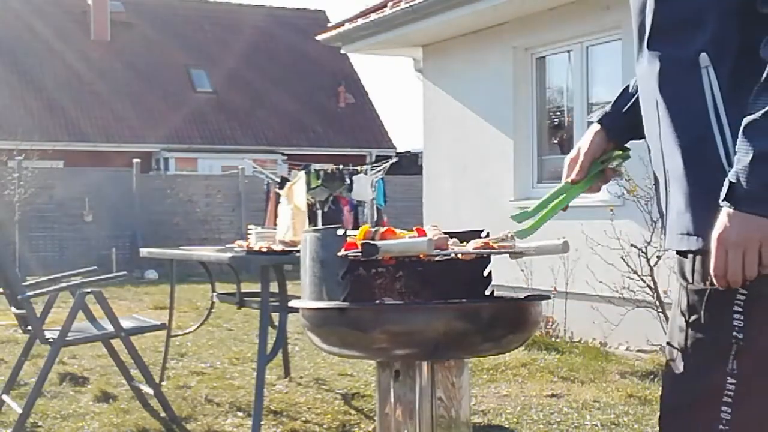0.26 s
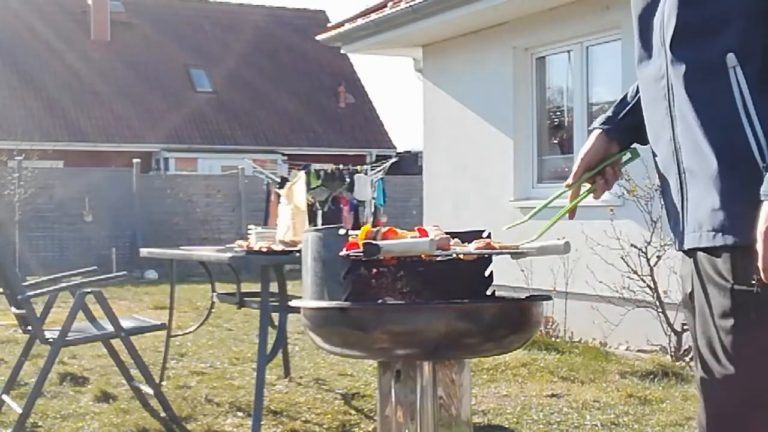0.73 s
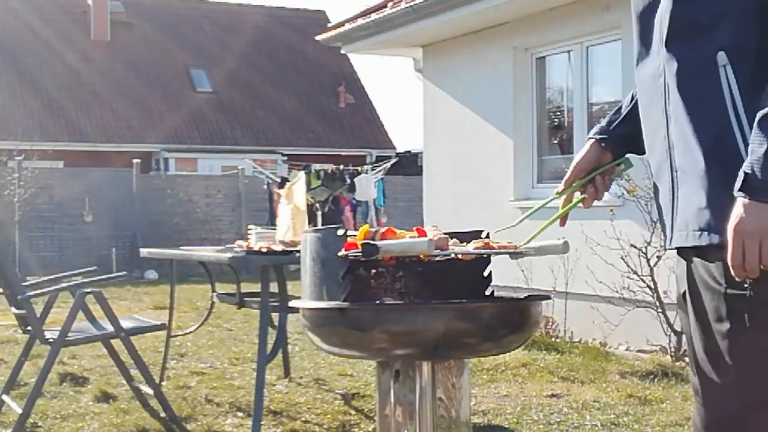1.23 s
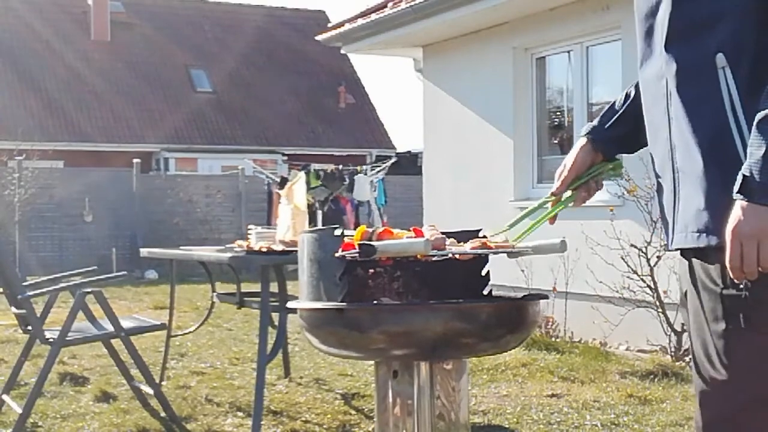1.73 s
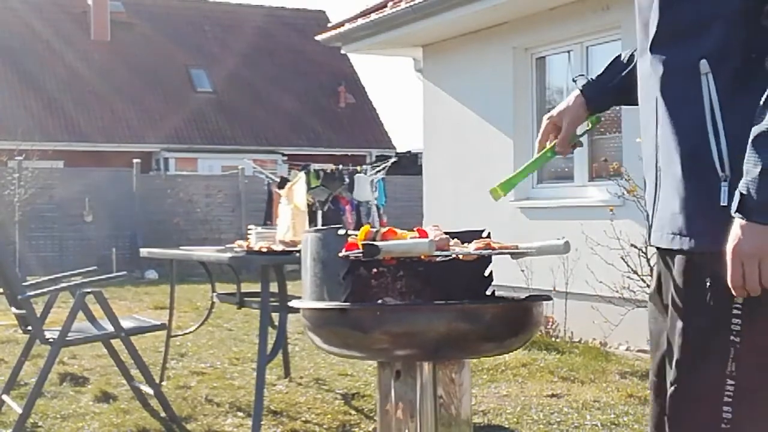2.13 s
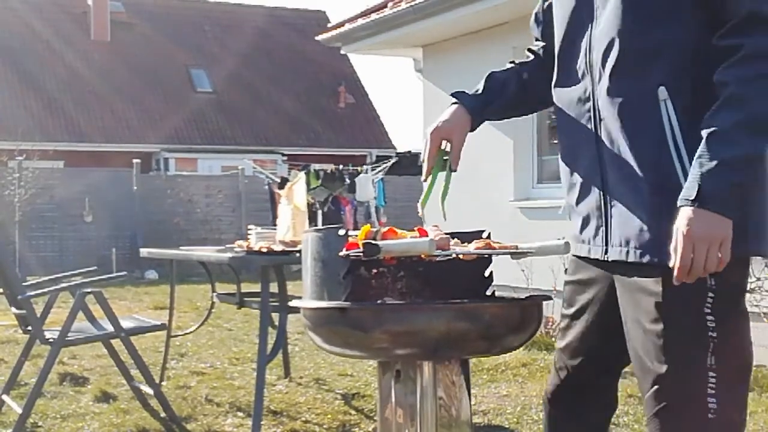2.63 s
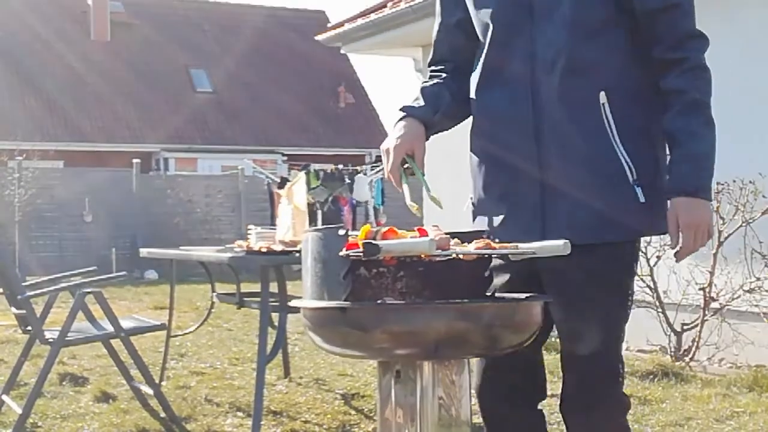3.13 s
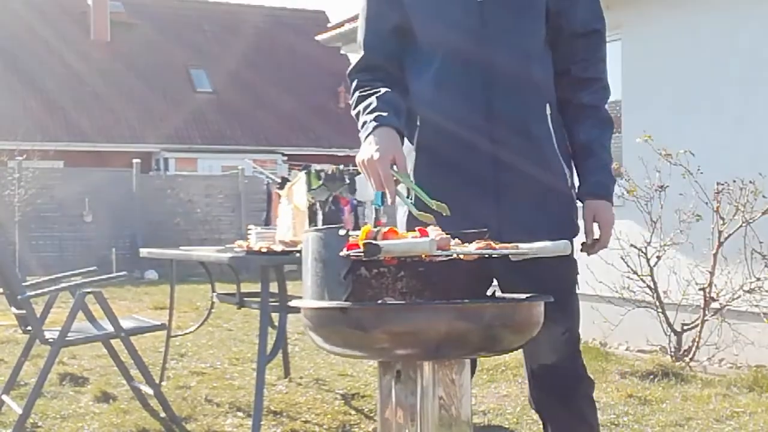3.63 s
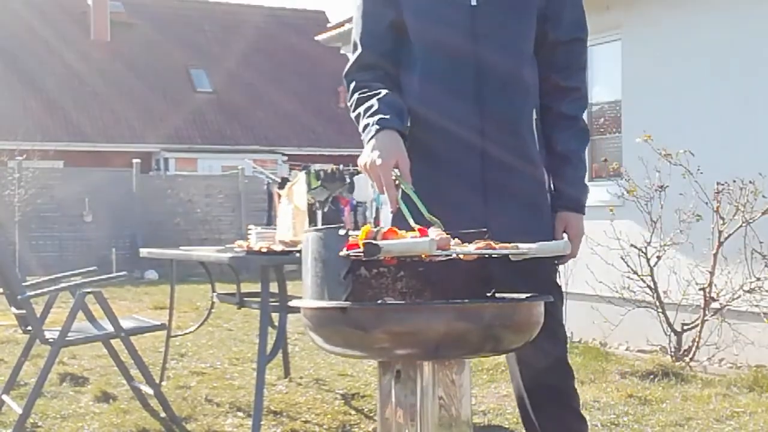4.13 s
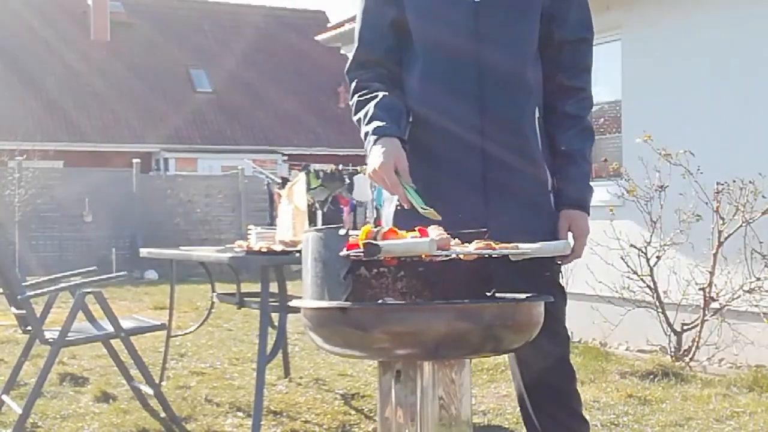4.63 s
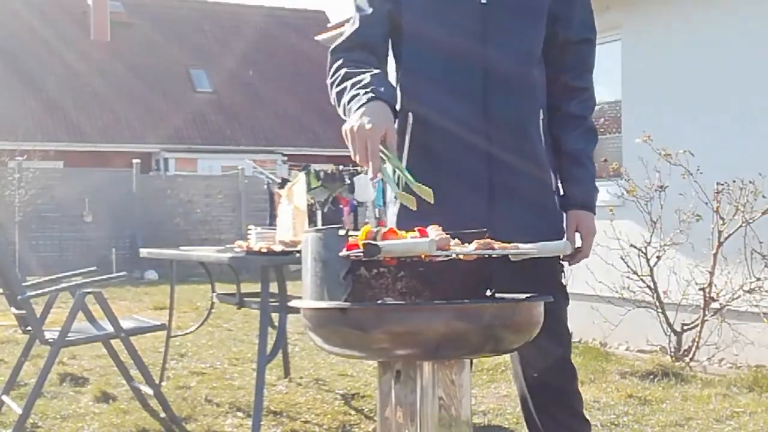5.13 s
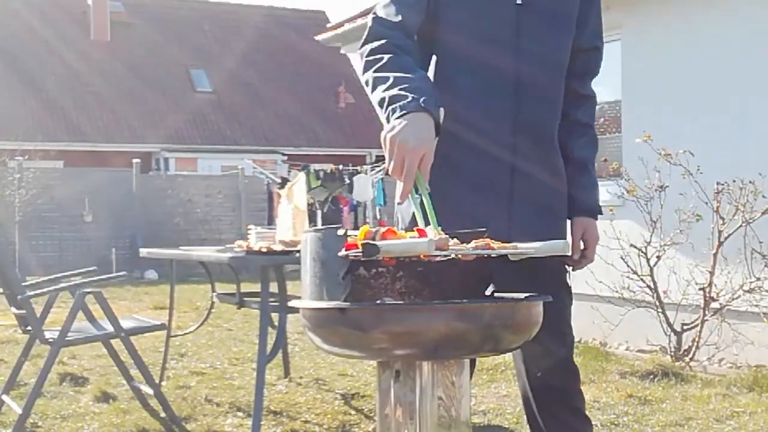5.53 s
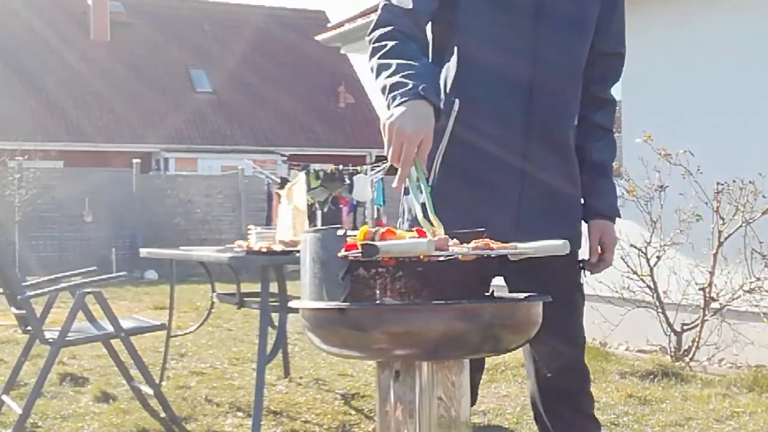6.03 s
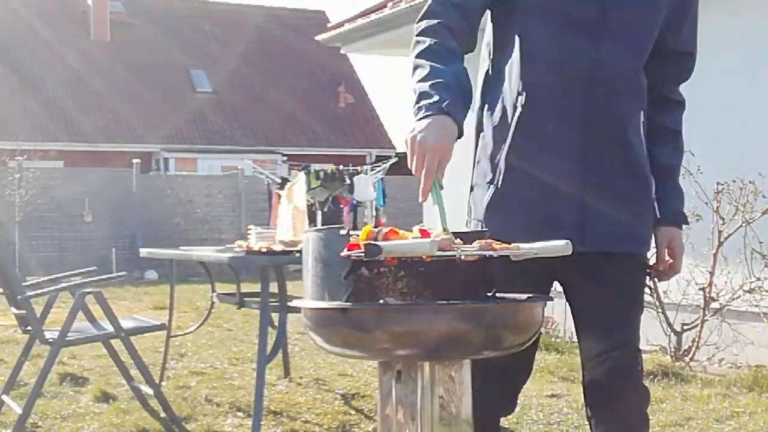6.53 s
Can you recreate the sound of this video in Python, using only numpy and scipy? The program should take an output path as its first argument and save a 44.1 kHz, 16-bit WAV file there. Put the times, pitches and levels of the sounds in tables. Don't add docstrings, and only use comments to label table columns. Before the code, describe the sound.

Outdoors, a hollow tray judders and lands, then steel tongs click and drag along grill bars over faint sizzle, car rumble, birdsong and late gusts.

```python
import sys
import numpy as np
from scipy import signal
from scipy.fft import rfft, irfft, next_fast_len
from scipy.io import wavfile
from scipy.ndimage import uniform_filter1d, map_coordinates

SR = 44100
rng = np.random.default_rng(int(sys.argv[2]) if len(sys.argv) > 2 else 0)


def transcribe(signal):
    frames = np.atleast_2d(signal).T
    limited = np.clip(frames, -1, 1)
    pcm = np.round(limited * 32767).astype(np.int16)
    wavfile.write(sys.argv[1], SR, pcm)


def gain_from_db(level_db):
    decades = np.asarray(level_db, float) / 20
    return 10 ** decades


N = 298943

# (time [s], level [dB])
CAR = [(0, -54), (.5, -52.5), (1.2, -48), (1.85, -44), (2.35, -42), (2.65, -48), (3.2, -50.5), (3.6, -53.5),
       (4.2, -52.5), (4.6, -64), (5, -60), (6.78, -60)]
# (frequency [Hz], width [Hz], level [dB])
RATTLE = [(2600, 530, 7), (3130, 630, 6), (3791.9, 250, 6), (4180, 120, 9), (4869, 390, 5)]


def unit(x):
    return x / np.sqrt(np.mean(x ** 2) + 1e-20)


def along(points, hz):
    f, v = np.transpose(points)
    return np.interp(np.log(hz + 1), np.log(f + 1), v)


def curves(rows):
    s, *cols = np.transpose(rows)
    return [np.interp(np.arange(N) / SR, s, c) for c in cols]


def wobble(rate):
    knots = rng.standard_normal(int(N * rate / SR) + 4)
    return map_coordinates(knots, [np.arange(N) * rate / SR])


def grit(rate, depth_db):
    return unit(gain_from_db(depth_db * wobble(rate) + 0.49 * depth_db * wobble(rate / 5)))


def swell(rows, landing_db=60, curl=1):
    now = np.arange(N) / SR
    t = np.arange(0, N, 22)[:, None] / SR
    s, rise, hold, db, fall = np.abs(np.transpose(rows))
    early_db = 60 * np.maximum(s - t, 0) / rise
    late_db = 60 * (np.maximum(t - s - hold, 0) / fall) ** curl
    level_db = -db - early_db - 10 * np.maximum(early_db - landing_db, 0) - late_db
    return np.interp(now, t[:, 0], np.linalg.norm(gain_from_db(level_db), axis=1))


def filtered(x, response):
    m = next_fast_len(N + 8192, True) // 2 * 2
    h = response(np.fft.rfftfreq(m, 1 / SR))
    h = h / np.sqrt(np.mean(np.abs(h) ** 2))
    return irfft(rfft(x, m) * h, m)[..., :N]


def colour(points):
    def response(hz):
        cepstrum = irfft(np.log(gain_from_db(along(points, hz)) + 1e-6))
        half = len(cepstrum) // 2
        cepstrum[1:half] *= 2
        cepstrum[half + 1:] = 0
        return np.exp(rfft(cepstrum))
    return response


def modes(table):
    def response(f):
        total = 0
        for k, (centre, width, db) in enumerate(table):
            band = 1j * f * width
            total = total + (-1) ** k * gain_from_db(db) * band / (centre * centre - f * f + band)
        return total
    return response


def pair(alike, lag, patchy_db=None):
    a, b = rng.standard_normal((2, N))
    alike = np.clip(alike, 0, 1)
    late = a[np.clip(np.arange(N) - np.round(lag).astype(int), 0, N - 1)]
    both = np.array([alike * late + np.sqrt(1 - alike ** 2) * b, a])
    if patchy_db is None:
        return both
    z = signal.stft(both, nperseg=512)[2]
    field = uniform_filter1d(rng.standard_normal(z.shape[1:]), size=2, axis=0)
    field = uniform_filter1d(field, size=5, axis=1)
    return unit(signal.istft(z * gain_from_db(patchy_db * unit(field)), nperseg=512)[1][:, :N])


def sides(pan_db):
    g = gain_from_db(np.array([pan_db / 2, -pan_db / 2]))
    return g / np.sqrt(np.mean(g ** 2, axis=0))


def add(out, s, burst):
    i = round(s * SR)
    out[..., i:i + burst.shape[-1]] += burst[..., :N - i]


def town_rumble():
    # (frequency [Hz], level [dB])
    rumble_spectrum = [(12, -41), (20, -17), (37, -2), (96, -2), (129, -4.5), (248, -7.5), (400, -22),
                       (520, -42.5), (880, -120)]
    lag_s = 0.14
    rumble_db, = curves([(s + lag_s, -53.5 + 0.71 * (db + 48.5)) for s, db in CAR])
    return gain_from_db(rumble_db + 3 + 1.5 * wobble(6)) * filtered(pair(.99, lag=0), colour(rumble_spectrum))


def passing_car():
    # (time [s], lag of left [samples], share common to both ports [0-1], ground comb [Hz],
    # bounce share [0-1])
    bearing = [(0, -27, 0.03, 1020, 0.13), (1, -22, 0.32, 1090, 0.28), (2.1, -23, 0.76, 1100, 0.65),
               (2.9, -15.5, 0.55, 980, 0.3514), (3.4, -14.5, 0.6, 1130, 0.3636),
               (3.8, -4.5, 0.25, 1136, 0.54), (4.3, -6, 0.55, 1260, 0.6194), (4.7, 7.5, 0, 1150, 0.097),
               (6.8, -9, 0.34, 990, 0.34)]
    # (time [s], frequency [Hz], level [dB])
    engine = [(0, 52.1, -55), (.6, 52.3, -47), (1.2, 52.4, -43.5), (1.7, 52.1, -47), (2.1, 51.4, -49.5),
              (2.4, 49.6, -61.5)]
    # (frequency [Hz], level [dB])
    tyres = [(120, -19), (200, -20), (250, -0.5), (310, -14.5), (480, -0.5), (610, -7), (900, -2),
             (1200, -2), (1600, -0.5), (2100, -12.5), (3000, -15), (4800, -21.5), (6000, -25.5),
             (8000, -38), (13000, -120)]
    car_db, = curves(CAR)
    lag, alike, ground_hz, share = curves(bearing)
    roar = filtered(pair(alike, lag), colour(tyres))
    dull = signal.sosfiltfilt(signal.butter(3, 2600, fs=SR, output="sos"), roar)
    bounce = np.zeros((2, N))
    for k in (1, 2, 3):
        delay = (k * SR / ground_hz).astype(int)
        bounce += share ** k * dull[:, np.clip(np.arange(N) - delay, 0, N)]
    evened = (roar + bounce) / (.93 * np.sqrt(1 + share ** 2 + share ** 4 + share ** 6))
    tyre_roar = gain_from_db(car_db + 3 + 1.1 * wobble(7)) * evened
    hum_hz, hum_db = curves(engine + [(engine[-1][0] + .3, engine[-1][1], -90)])
    hum = gain_from_db(hum_db - 2.0 + 1.5 * wobble(4.98)) * np.sin(2 * np.pi * np.cumsum(hum_hz) / SR)
    return tyre_roar + hum


def wind():
    # (frequency [Hz], level [dB])
    buffet = [(12, -17), (20, -6.5), (59, -1), (140, -13.5), (180, -38), (310, -120)]
    # (frequency [Hz], level [dB])
    flutter = [(71, -18.5), (120, -2.5), (257, -18.5), (458, -44), (553, -73), (600, -40.5), (780, -89),
               (1320, -120)]
    # (time at full force [s], hold [s], level [dB])
    gusts = [(4.899, 0, -39.5), (4.973, 0, -40.5), (5.131, 0.05756, -42.5), (5.268, 0.023, -35.5),
             (5.371, 0.15, -36.5), (5.62, 0.0096, -39.5), (5.682, 0.034, -33), (5.862, 0.00548, -32),
             (5.952, 0.017, -32), (6.041, 0.089, -33.5), (6.155, 0.171, -29), (6.381, 0.0031, -28.5),
             (6.431, 0.097, -30), (6.585, 0, -36), (6.624, 0.018, -29.5), (6.737, 0, -29.5)]
    # (time [s], peak level [dB], length [s])
    puffs = [
        (2.437, -20.5, 0.01004),
        (5.869, -30.5, 0.0057),
        (6.367, -34, 0.0069),
        (6.624, -24, 0.0088),
    ]
    rise_s, fall_s = 0.30284, 0.13
    breeze_start_s, breeze_db, breeze_db_per_s = 4.7, -52.5, 8
    since = np.arange(N) / SR - breeze_start_s
    breeze = gain_from_db(breeze_db + breeze_db_per_s * since + 92 * np.minimum(since, 0))
    gusting = swell([(s, rise_s, hold, db, fall_s) for s, hold, db in gusts])
    buffet_db = 20 * np.log10(np.hypot(breeze, gusting))
    flutter_db = -10.0 + 0.88 * (buffet_db + 35.0)
    lumps = unit(gain_from_db(2.25 * wobble(30)))
    out = gain_from_db(buffet_db) * lumps * filtered(pair(0.89, lag=0), colour(buffet))
    out += gain_from_db(buffet_db + flutter_db) * lumps ** 1.3 * filtered(pair(.72, lag=0), colour(flutter))
    for s, db, length in puffs:
        u = np.linspace(0, 3, int(3 * length * SR))
        add(out, s, gain_from_db(db - 3.0) * np.sin(np.pi * u) * np.exp(-1.2 * u))
    return out


def sparrows():
    # (time [s], frequency [Hz], level [dB])
    chirps = [
        [(.362, 3400, -58), (.378, 4600, -51), (.402, 4750, -52), (.408, 4200, -50), (.418, 3900, -54)],
        [(.462, 3200, -60), (.477, 3900, -55), (.49, 3400, -56)],
        [(1.366, 4400, -42), (1.4, 2900, -44)],
        [(1.968, 4550, -54), (1.99, 4750, -46), (2.025, 4600, -52)],
        [(4.867, 4150, -53), (4.877, 4750, -49), (4.884, 5000, -56), (4.894, 3400, -53)],
        [(4.913, 2700, -53), (4.922, 2900, -46), (4.926, 3100, -55)],
        [(4.894, 4250, -46), (4.907, 4800, -47), (4.916, 5100, -56), (4.926, 4300, -47), (4.933, 3200, -53),
         (4.945, 2700, -54), (4.962, 3400, -50), (4.972, 3250, -57)],
        [(5.864, 4100, -47), (5.882, 4800, -41), (5.89, 5100, -52), (5.898, 4000, -43)],
        [(5.899, 4350, -44), (5.915, 4950, -48), (5.927, 4300, -45), (5.933, 3050, -47)],
        [(5.935, 3300, -50), (5.947, 3400, -43), (5.955, 3700, -46), (5.962, 4750, -45), (5.967, 4100, -47)],
        [(5.965, 3300, -41), (5.985, 3800, -42), (5.992, 4600, -51), (5.997, 3400, -42), (6.004, 2950, -43),
         (6.012, 3200, -45), (6.023, 2950, -47)],
    ]
    # (time [s], frequency [Hz], level [dB])
    peeps = [
        (3.99, 2420, -53),
        (4.152, 3602, -54.5),
        (5.38, 2370, -59),
        (5.608, 2320, -60),
        (6.235, 2562, -54),
    ]
    # (delay [s], level [dB])
    echoes = [(.009, -13), (.017, -14), (.031, -15)]
    peep_s, peep_sag, edge_s, flutter_db = .033, .95, .003, 2.5
    out, warble, flutter = np.zeros(N), wobble(260), wobble(300)
    far_notes = [[(s, hz, db - 3), (s + peep_s, peep_sag * hz, db - 3)] for s, hz, db in peeps]
    for note in chirps + far_notes:
        s, hz, db = np.transpose(note)
        t = np.arange(s[0], s[-1], 1 / SR)
        first = round(s[0] * SR)
        now = slice(first, first + len(t))
        glide = uniform_filter1d(np.interp(t, s, hz), size=90) * (1 + .01 * warble[now])
        soft_ends = np.minimum(np.minimum(t - s[0], s[-1] - t) / edge_s, 1)
        size = gain_from_db(np.interp(t, s, db) + flutter_db * flutter[now]) * soft_ends
        add(out, s[0], size * np.sin(2 * np.pi * np.cumsum(glide) / SR))
    scattered = sum(gain_from_db(db) * np.roll(out, round(s * SR)) for s, db in echoes)
    out = gain_from_db(-1) * (out + scattered)
    return np.array([out, np.roll(out, 22)])


def footsteps():
    # (time [s], frequency [Hz], peak level [dB], length [s])
    footfalls = [
        (2.68, 99.8, -48, 0.1839),
        (2.96, 95.74, -41, 0.16565),
        (4.12, 111, -49, .14),
    ]
    out = np.zeros((2, N))
    for s, hz, db, length in footfalls:
        t = np.arange(int(length * SR)) / SR
        add(out, s, gain_from_db(db) * np.sin(np.pi * t / length) * np.sin(2 * np.pi * hz * t))
    return out


def sizzle():
    # (time [s], level [dB])
    frying = [(0, -55), (.8, -54), (1.1, -60), (1.3, -48.5), (1.6, -48.5), (1.85, -55.5), (2.2, -45.5),
              (2.9, -54.5), (3.3, -47), (3.9, -55), (4.3, -58), (4.65, -59), (5, -56), (5.25, -60.5),
              (5.45, -51.5), (6.1, -55), (6.78, -52.5)]
    # (frequency [Hz], level [dB])
    fizz_spectrum = [(1180, -60), (2000, -33), (2300, -10.5), (4130, -8.5), (4630, -10.5), (6470, -9.5),
                     (8660, 2.5), (9800, -4.5), (15500, -37.5), (16100, -24), (16500, -61)]
    fizz_db, = curves(frying)
    spits = gain_from_db(1.1 * wobble(3.2)) * grit(300, depth_db=0.5)
    fizz = filtered(spits * pair(0.15, lag=19, patchy_db=3.0), colour(fizz_spectrum))
    return gain_from_db(fizz_db + 0.5) * sides(-3.0)[:, None] * fizz


def pop():
    # (time [s], peak level [dB], start frequency [Hz], end frequency [Hz], t60 [s])
    bursts = [
        (2.536, -10.5, 3578, 1480, 0.027),
        (2.538, -12.5, 1215, 870, 0.015),
    ]
    out, t = np.zeros((2, N)), np.arange(SR // 10) / SR
    for s, db, start_hz, end_hz, t60 in bursts:
        hz = end_hz + (start_hz - end_hz) * np.exp(-t / 0.00085)
        decay = gain_from_db(db - 60 * t / t60) * np.minimum(t / 0.0011, 1)
        tone = decay * np.sin(2 * np.pi * np.cumsum(hz) / SR)
        add(out, s, sides(-13)[:, None] * [np.roll(tone, 19), tone])
    return out


def brushes():
    # (time [s], peak level [dB], t60 [s], left over right [dB])
    touches = [(2.13, -39, 0.085, -1), (2.235, -39, 0.72, -5.5), (2.348, -23, .04, -10),
               (2.44, -28.5, 0.24, -10), (2.534, -25.5, 0.046, -11), (3.689, -39.5, 0.45, -7.5),
               (3.81, -47, 0.14, 3.5), (5.765, -41.5, 0.16, -1), (5.83, -59.5, 0.03, 1)]
    out, t = np.zeros((2, N)), np.arange(SR // 6) / SR
    for s, db, t60, pan_db in touches:
        add(out, s, gain_from_db(db - 60 * t / t60) * np.minimum(t / 0.0013, 1) * sides(pan_db)[:, None])
    return filtered(out * pair(0.63, lag=12.2, patchy_db=4.0), modes(RATTLE))


def tray():
    # (time at full force [s], rise per 60 dB [s], hold [s], level [dB], fall per 60 dB [s])
    shoves = [(1.249, 0.1, .01, -47, 1.3), (1.271, 0.12, .008, -43.5, -0.03),
              (1.3, 0.03, 0.033, -46.5, -0.1), (1.351, 0.11, .045, -42, -0.03),
              (1.425, 0.25, .015, -44, 0.3), (1.465, -0.44, .004, -43, 0.0043),
              (1.507, 0.27, 0.019, -40.5, 0.45), (1.658, 0.7, .01, -51, .5)]
    # (time [s], peak level [dB], rattle re
    # peak [dB], contact [s])
    knocks = [
        (1.6146, -21, -7, 0.00094),
        (1.6211, -26, -8, 0.00057),
        (1.6237, -26.5, -11, .0004),
        (1.6435, -35, -14, 0.00068),
        (1.664, -36, -20, 0.0021),
        (2.536, -34.5, -20, .0007),
    ]
    # (frequency [Hz], width [Hz], level [dB])
    body_modes = [(191.54, 31, 0), (332, 34, 2.5), (710, 87, 2), (1461.9, 490, -8), (2103.8, 310, -8.5)]
    # (time [s], peak level [dB], frequency [Hz])
    jingles = [(1.243, -38.5, 4800), (1.268, -33, 4240), (1.269, -35.5, 4800), (1.323, -35, 4900),
               (1.348, -29, 4240), (1.355, -32, 1510), (1.375, -37, 5000), (1.39, -37, 2000),
               (1.41, -38, 2060), (1.5, -40, 2700), (1.52, -37, 2550), (1.555, -39, 4180),
               (1.467, -36, 3950), (1.511, -34, 4800), (1.628, -31, 4226), (1.624, -28, 2470),
               (1.621, -31, 2040)]
    # (time [s], frequency [Hz], level [dB])
    judder = [(1.25, 449.8, -63), (1.34, 525.5, -44), (1.4, 582, -53), (1.47, 688.9, -41.5),
              (1.53, 722, -32.5), (1.58, 726, -52), (1.636, 715.4, -65.5), (1.645, 718.6, -40),
              (1.665, 745, -64.5)]
    rim_db, rim_grows = -43.5, 0.48
    rim_shoves = [(s, rise, hold, rim_db + rim_grows * (db - rim_db), 0.81 * fall)
                  for s, rise, hold, db, fall in shoves]
    body = swell(shoves) * gain_from_db(4.0) * grit(150, depth_db=0.5) * pair(0.98, lag=26.0, patchy_db=1.5)
    rim = swell(rim_shoves) * grit(200, depth_db=2.5) * pair(0.19, lag=36.0, patchy_db=2.0)
    t = np.arange(SR // 8) / SR
    for s, db, shake_db, contact in knocks:
        push = np.sin(np.pi * np.minimum(t / contact, 1))
        add(body, s, gain_from_db(db + 2.5) * np.array([np.roll(push, 28), push]))
        shake = gain_from_db(db + shake_db - 7 - 60 * t / 0.086)
        add(rim, s + 0.002, shake * rng.standard_normal((2, len(t))))
    jingle = np.zeros(N)
    for s, db, hz in jingles:
        decay = gain_from_db(db - 60 * t / 0.055) * np.minimum(t / 0.0024, 1)
        add(jingle, s, decay * np.sin(2 * np.pi * hz * t))
    start, end = judder[0], judder[-1]
    hz, db = curves([(start[0] - .05, start[1], -99)] + judder + [(end[0] + .2, end[1], -99)])
    groan = gain_from_db(db + 7.6 * wobble(80)) * np.sin(2 * np.pi * np.cumsum(hz) / SR)
    body = filtered(body, modes(body_modes)) + [np.roll(groan, 28), groan]
    rim = filtered(rim, modes(RATTLE)) + [np.roll(jingle, 36), jingle]
    return sides(-4.5)[:, None] * body + sides(-10.5)[:, None] * rim


def clacks():
    # (time [s], peak level [dB], shine of the tips [dB], low mode [dB], rise [s])
    snaps = [(2.83, -11.5, -25, -33, 0.0014), (4.525, -22, -22, -36, 0.0038),
             (4.529, -3.5, -25, -31, 0.0038), (4.5332, -7.5, -26, -42, 0.0017),
             (4.654, -7.5, -9, -19, 0.0016), (4.673, -14.5, -16, -25, 0.0014),
             (5.6868, -15, -20, -31, 0.0039), (5.694, -29, -26, -34, .0012)]
    # (frequency [Hz], width [Hz], level [dB])
    arms = [(2100, 230, 0), (3428.7, 1400, -15), (4471.6, 620, -3), (5152.3, 1058, -3), (6524.5, 600, 3),
            (8276, 960, 6), (9080, 350, 12.5), (9080, 75.94, 8.5), (9660, 630, -0.5)]
    # (frequency [Hz], width [Hz], level [dB])
    shine = [(11360, 1386, 0), (13439, 1600, -1), (15499, 1494, -6)]
    high, top, low = np.zeros((3, 2, N))
    t = np.arange(SR // 6) / SR
    for s, db, shine_db, low_db, rise in snaps:
        after = np.maximum(t - rise, 0)
        decay = gain_from_db(-60 * after / .02) + gain_from_db(-26 - 60 * after / .07) + gain_from_db(-42 - 60 * after / .6)
        blow = decay * np.minimum(t / rise, 1) ** 3 * sides(-7.0)[:, None]
        add(high, s, gain_from_db(db - 4.5) * blow)
        add(top, s, gain_from_db(db + shine_db) * blow)
        add(low, s, gain_from_db(db + low_db) * blow)
    top = filtered(top * pair(0.192, lag=24), lambda f: modes(shine)(f) ** 2)
    high = filtered(high * pair(0.073, lag=24, patchy_db=3.5),
                    lambda f: modes(arms[1:])(f) / (1 + 1j * (f / 11000) ** 3))
    low = filtered(low * pair(0.93, lag=21.5), modes(arms[:1]))
    return top + high + low


def tongs_on_grate():
    # (time at full force [s], rise per 60 dB [s], hold [s], level [dB], fall per 60 dB [s])
    rim_strokes = [(.88, 0.45, 0, -50, 0.3), (2.16, -0.2, 0, -52, -0.7), (2.231, .03, .01, -36.5, .2),
                   (2.349, .02, .01, -28, .2), (2.366, .1, .026, -18, .1), (2.404, .06, .012, -19, .06),
                   (2.424, .04, .008, -21, .06), (2.547, .03, .026, -32, .07),
                   (2.586, .03, .014, -36.5, .05)]
    # (time at full force [s], rise per 60 dB [s], hold [s], level [dB], fall per 60 dB [s])
    bar_strokes = [(2.437, .03, .02, -18.5, .02), (2.459, .02, .018, -23, .16),
                   (3.152, 0.011, 0.007, -22, 0.03), (3.169, .01, .014, -21, .07),
                   (3.195, .01, .02, -21, .1), (3.228, .06, .04, -19, .2), (3.306, .06, .018, -22, .08),
                   (5.766, .01, .006, -45, .06), (3.359, 0.008, 0.011, -24.5, 0.055),
                   (3.464, 0.033, 0.0043, -25.5, 0.067), (3.667, 0.044, .004, -22, 0.091),
                   (3.699, 0.077, 0.0032, -17, 0.13), (3.811, 0.04, 0, -30, 0.07)]
    # (time [s], peak level [dB], grate body re peak [dB], t60
    # [s])
    taps = [(1.6205, -30, 0, 0.18), (2.162, -31, 0.5, 0.017), (2.5637, -26, -27, 0.021),
            (2.5864, -47, -8, 0.03), (2.633, -20, -25, 0.023), (2.702, -29.5, -28, 0.02217),
            (2.777, -31.5, -12, 0.081), (2.8374, -29, -26, 0.065), (2.89, -17.5, -32, 0.025),
            (3.15, -22, -39, 0.021), (3.409, -16.5, -44, 0.041), (3.4328, -8, -44, 0.032),
            (3.461, -10, -42, 0.019), (3.529, -18.5, -35, 0.014), (3.586, -33.5, -14, 0.031),
            (3.6219, -37, -17, 0.077), (3.669, -23.5, -25, 0.02636), (3.7505, -20, -36, 0.074),
            (3.8094, -25, -34, 0.02), (3.8754, -26.5, -11, 0.015), (3.9911, -29, -22, 0.072),
            (4.0403, -26, -22, 0.029), (4.073, -9.5, -27, 0.014), (4.147, -36, -9.5, 0.047)]
    # (time [s], peak level [dB], grate body re peak [dB])
    ticks = [(.95, -47, -8), (0.9744, -31.5, -6), (1.072, -33.5, -7), (1.466, -45, 19.5),
             (1.7503, -38, 6.5), (1.775, -46.5, -10), (2.224, -36.5, 9), (2.302, -34.5, 1.5),
             (2.8044, -46, -7.5), (5.713, -34.5, -10), (5.83, -48, -8), (6.2128, -40.5, -4),
             (6.4694, -39.5, -7.5)]
    # (time [s], level [dB])
    snags = [(2.3478, -15), (2.371, 2), (2.379, 6), (2.389, 3), (2.406, 1), (2.416, 7), (2.567, -10.5),
             (2.8309, -14), (2.89, -5.5), (2.44, 10), (3.1513, -7), (3.168, -4), (3.178, -5), (3.194, 0),
             (3.225, -4), (3.246, 3), (3.26, 3), (3.316, 1), (3.2655, -4), (3.305, -3), (3.3585, -8),
             (3.673, 8), (3.7, 8.5), (3.714, -17), (3.756, -6), (3.812, -1)]
    # (frequency [Hz], level [dB])
    bright = [(1180, -76), (2000, -41), (3490, -22), (4550, -17), (5670, -17), (6030, -15), (7070, -11),
              (7720, -2.5), (8820, 2.5), (12100, -17), (13100, -14), (14200, -20.5), (15700, -16),
              (16500, -31)]
    # (frequency [Hz], level [dB])
    grate = [(180, -68), (300, -7), (560, -19), (919, -1.5), (1240, -7), (1730, -2.5), (5500, -10),
             (6500, -6.5), (8450, -12), (14300, -120)]
    # (frequency [Hz], width [Hz], level [dB])
    steel_ring = [(6233, 39.7, -13), (7540, 19, -9.5), (7940, 34.1, -5), (8000, 41.28, 6), (8560, 25, 6),
                  (8500, 39, -16), (8900, 27, -14), (9560, 32.55, -7), (9450, 49, 3.5), (10000, 44, -4),
                  (11026, 17, -17), (10500, 22, -16), (11300, 44, -0.5),
                  (6300, 40, -8), (11520, 30, -3), (12748, 30, -7), (12971, 30, -3), (13610, 40, -7.5),
                (14450, 40, -11), (15340, 30, -10)]
    tongs_pan_db, tick_pan_db, tick_t60 = -10.5, -0.5, 0.035
    rim_body_db, bar_body_db = -6.5, -33.5
    landing_db, lift_curl = 12, 1.3
    t = np.arange(SR // 6) / SR
    tongs_sides = sides(tongs_pan_db)[:, None]
    rough = grit(1100, depth_db=1.0) * tongs_sides
    rim = swell(rim_strokes, landing_db, lift_curl)
    middle = swell(bar_strokes, landing_db, lift_curl)
    tips = gain_from_db(2.5) * (rim + middle) * rough
    bars = (gain_from_db(rim_body_db) * rim + gain_from_db(bar_body_db) * middle) * rough
    contacts = [(*row, tongs_pan_db) for row in taps] + [(*row, tick_t60, tick_pan_db) for row in ticks]
    for s, db, body_db, t60, pan_db in contacts:
        crack = gain_from_db(-12.0 - 60 * t / (0.3537 * t60))
        rattle = gain_from_db(-4.5 - 60 * t / t60)
        ring = gain_from_db(-23 - 60 * t / (4 * t60))
        blow = (crack + rattle + ring) * np.minimum(t / 0.0024, 1) ** 0.86 * sides(pan_db)[:, None]
        add(tips, s, gain_from_db(db) * blow)
        add(bars, s, gain_from_db(db + body_db - 0.5) * blow)
    tips = tips * pair(0.269, lag=19, patchy_db=5.5)
    click = np.eye(20)[[19, 0]]
    for s, db in snags:
        add(tips, s, gain_from_db(db) * tongs_sides * click)
    hiss = filtered(tips, colour(bright))
    ringing = gain_from_db(-9.0) * filtered(tips, modes(steel_ring))
    body = filtered(bars * pair(0.069, lag=19, patchy_db=7.0), colour(grate))
    return hiss + ringing + body


def walls(x):
    # (frequency [Hz], t60 [s])
    wall_decay = [(300, 0.066), (3000, 0.14), (12000, 0.0056)]
    hz, t, z = signal.stft(rng.standard_normal((2, SR // 3)), SR, nperseg=256)
    fade = gain_from_db(-60 * t / along(wall_decay, hz)[:, None])
    tail = signal.istft(z * fade, SR, nperseg=256)[1]
    tail = np.pad(tail / np.linalg.norm(tail[0]), ((0, 0), (400, 0)))
    return signal.fftconvolve(x, tail, axes=1)[:, :N]


def scene():
    far = sparrows()
    near = pop() + tray() + clacks() + tongs_on_grate()
    reflected = walls(gain_from_db(-17.0) * near + gain_from_db(-16) * far)
    bed = town_rumble() + passing_car() + wind() + footsteps() + sizzle() + brushes()
    return bed + far + near + reflected


def top_cut(x):
    return signal.sosfilt(signal.butter(12, 16830, fs=SR, output="sos"), x)


def record(dry):
    dry = dry + gain_from_db(-69) * rng.standard_normal(dry.shape)
    flat = dry / (1 + np.abs(dry / .82) ** 6) ** (1 / 6)
    roll_off = signal.ellip(12, .5, 70, 15720, fs=SR, output="sos")
    return top_cut(signal.sosfilt(roll_off, flat))


dry = scene()
out = record(dry)
transcribe(out)
```